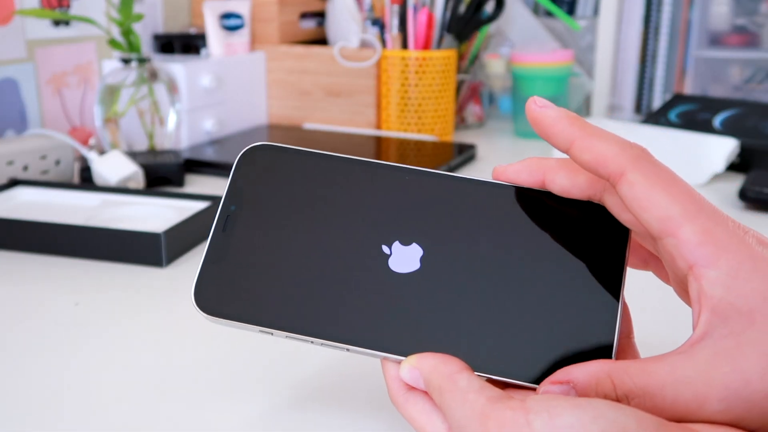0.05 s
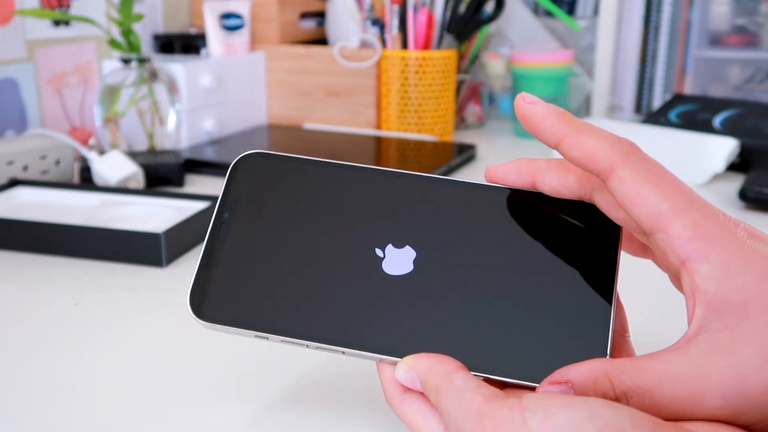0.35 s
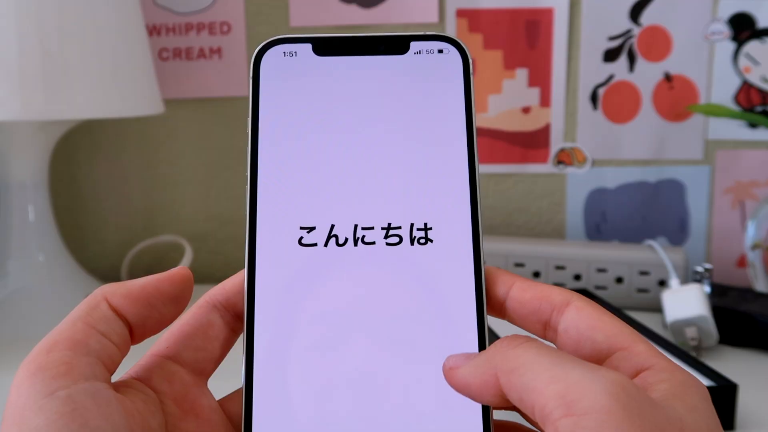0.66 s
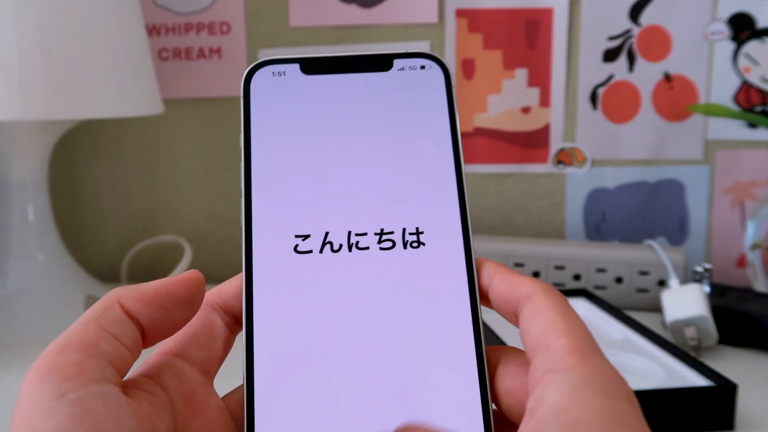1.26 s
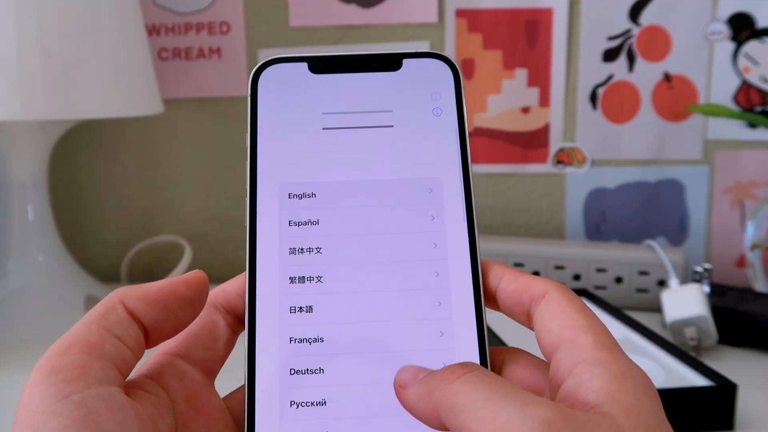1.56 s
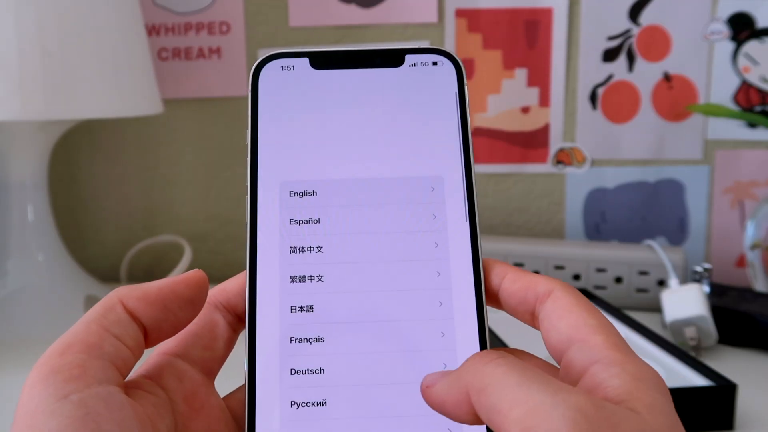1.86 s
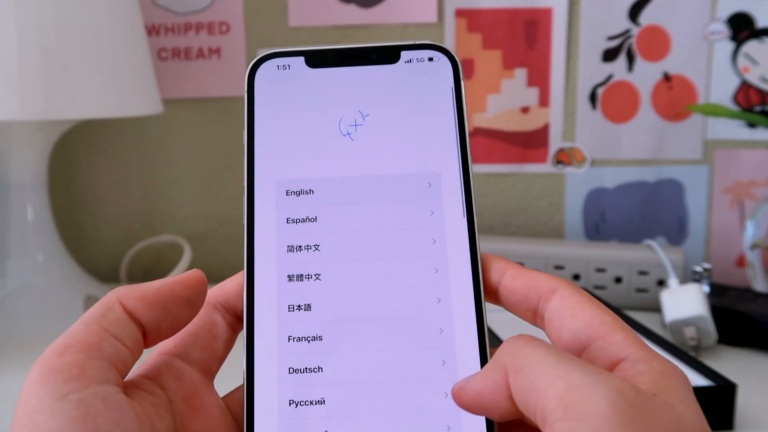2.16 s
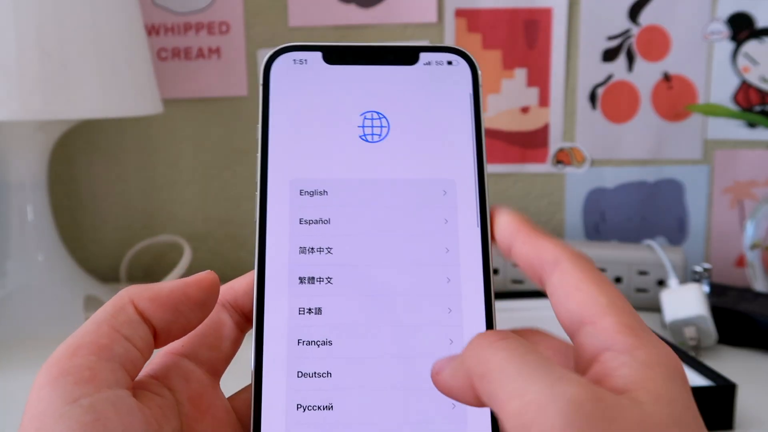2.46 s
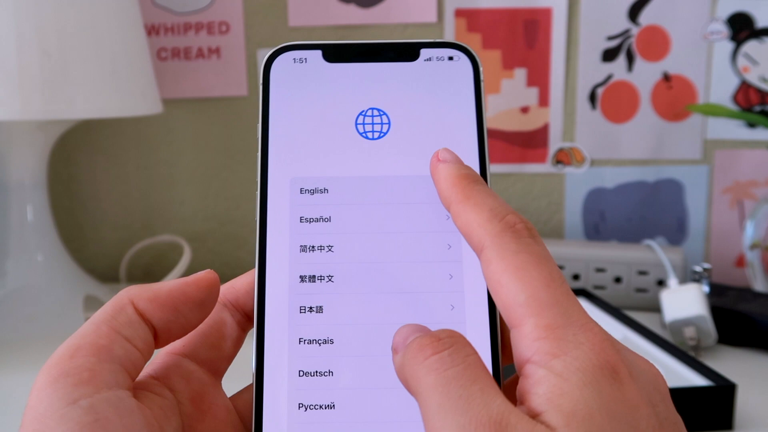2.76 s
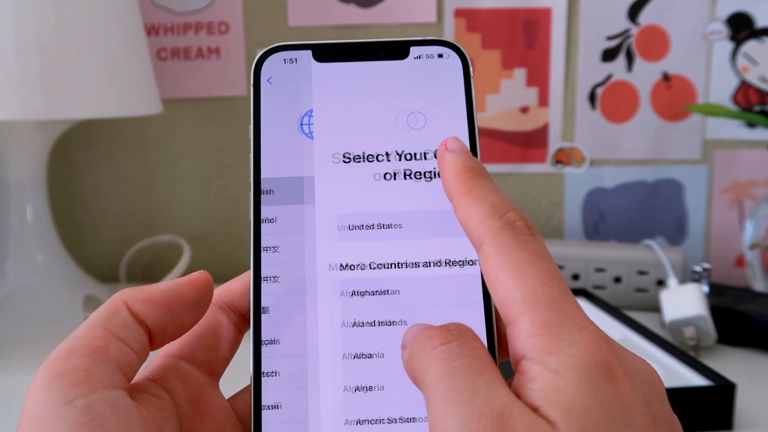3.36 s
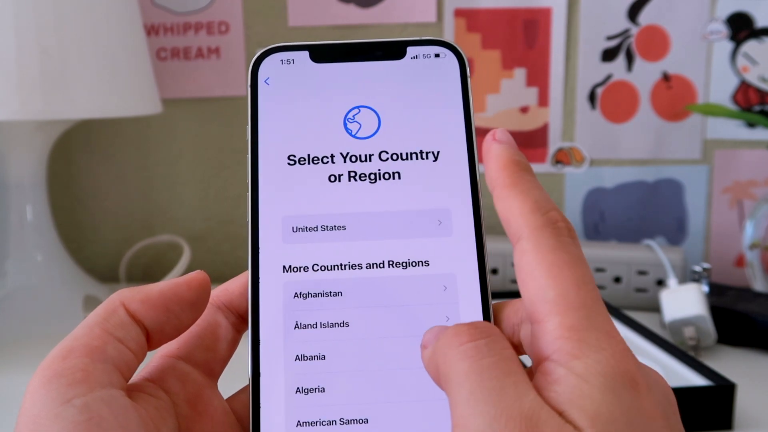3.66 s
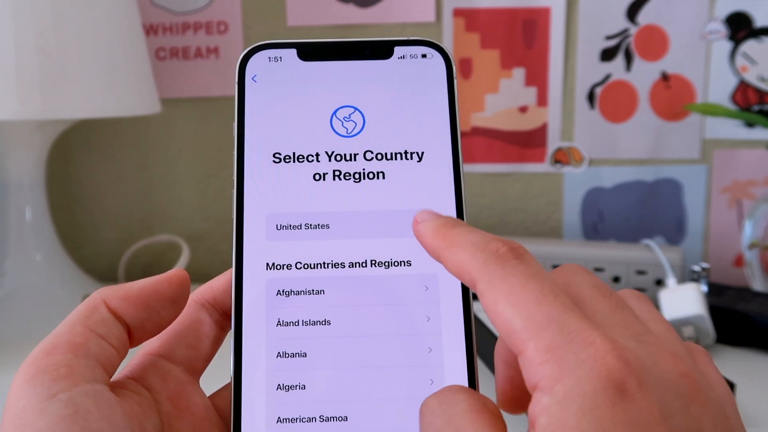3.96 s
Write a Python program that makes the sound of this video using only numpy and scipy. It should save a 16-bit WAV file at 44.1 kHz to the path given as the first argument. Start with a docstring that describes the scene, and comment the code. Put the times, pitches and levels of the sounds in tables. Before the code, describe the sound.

Fingers handle and tap a phone close to the microphone, making irregular small clicks, soft thuds and light skin crackles. The small quiet room has a low rumble and a faint hiss, slightly stronger at the start.

```python
"""A small quiet room, where hands turn, grip and tap a phone close to the microphone.
Each tick is a burst of tiny slips of skin or nail that ring the casing. Skin rustles, crackles and
rubs on the case, fingertips land with soft thuds, and the moving hands make dull bumps.
Underneath lie a low rumble and a faint hiss, which is stronger and carries a thin whine at first."""
import sys
import numpy as np
from scipy import signal
from scipy.fft import rfft, irfft
from scipy.io import wavfile
from scipy.ndimage import uniform_filter1d

SR = 44100
rng = np.random.default_rng(int(sys.argv[2]) if len(sys.argv) > 2 else 0)


def persist_wave(psi):
    """Save psi, clipped to +-1, as 16-bit WAV."""
    counts = np.round(np.clip(psi, -1, 1) * 32767).astype(np.int16)
    wavfile.write(sys.argv[1], SR, np.atleast_2d(counts).T)


N = 176400  # 4 seconds


def undb(db):
    """Turn decibels (dB) into a number to multiply by."""
    return 10 ** (np.asarray(db) / 20)


def unit(x):
    """Scale to an energy of one."""
    return x / np.sqrt(np.mean(np.sum(x ** 2, axis=-1)) + 1e-20)


def level(x, db):
    """Set the average level in dB."""
    return x * undb(db) / np.sqrt(np.mean(x ** 2))


def colour(x, points):
    """Turn frequencies up or down along a curve of (Hz, dB) points."""
    hz, db = np.array(points).T
    f = np.fft.rfftfreq(x.shape[-1], 1 / SR)
    return irfft(rfft(x) * undb(np.interp(np.log(f + 1), np.log(hz), db)), x.shape[-1])


def band(x, low_hz, high_hz):
    """Keep one range of frequencies."""
    f = np.fft.rfftfreq(x.shape[-1], 1 / SR) + 1
    off_centre = (f * f - low_hz * high_hz) / (f * (high_hz - low_hz))
    return irfft(rfft(x) / (1 + off_centre ** 4), x.shape[-1])


def stereo_noise(side_db):
    """Noise shared by left and right, plus a part in which they differ."""
    mid, side = rng.standard_normal((2, N))
    return mid + undb(side_db) * side * np.array([[1], [-1]])


def wander(per_s):
    """A smooth random curve with a spread near one."""
    hold = int(SR / per_s)
    steps = np.repeat(rng.standard_normal(N // hold + 1), hold)
    return level(uniform_filter1d(uniform_filter1d(steps, hold), hold)[:N], 0)


def scatter(size, db):
    """Random strengths, spread by about this many dB."""
    return undb(db * np.clip(rng.standard_normal(size), -2, 2))


def decay(t, t60):
    """Fade by 60 dB every t60 seconds."""
    return np.exp(-np.log(1000) * t / t60)


def add(out, x, start_s):
    """Mix a short sound in."""
    i = int(start_s * SR)
    a, b = max(i, 0), min(i + x.shape[-1], N)
    out[:, a:b] += x[..., a - i:b - i]


# The rumble's tone. Each row: frequency in Hz, boost or cut in dB.
RUMBLE_TONE = [(15, -25), (28, -6), (45, -2), (68, 2.5), (95, -1.5), (125, -2), (165, -7), (230, -13.5),
               (330, -16), (450, -20.5), (700, -42), (1200, -40), (3000, -59.5)]
def rumble():
    """A low rumble whose level wavers."""
    noise = colour(stereo_noise(side_db=-32.5), RUMBLE_TONE)
    return level(noise * undb(1.5 * wander(per_s=24.95)), db=-37.5)


# The hiss's tone. Each row: frequency in Hz, boost or cut in dB.
HISS_TONE = [(200, 14), (900, -1), (1800, 1.5), (3200, -2), (5200, 0.5), (6500, -6), (8000, -1),
             (11000, -8.5), (15500, -15)]
# How the hiss drifts. Each row: time in seconds, level in dB.
HISS_DRIFT = [(0, -56.5), (.9, -59), (1.62, -60.5), (1.9, -60), (2.15, -60), (2.6, -61.5), (3.05, -63),
              (3.45, -61), (4, -61)]
def hiss(t):
    """A faint hiss that slowly sinks a little."""
    noise = level(colour(stereo_noise(side_db=-3), HISS_TONE), db=0)
    return noise * undb(np.interp(t, *np.array(HISS_DRIFT).T))


# The opening hiss's tone. Each row: frequency in Hz, boost or cut in dB.
OPENING_TONE = [(100, -6), (200, 12.5), (400, 8), (800, 0), (1600, -5.5), (3500, -12), (8000, -21),
                (15500, -43)]
def opening_hiss(t, hold_s=0.636, fade_s=0.052):
    """A stronger, duller hiss with a thin whine; both soon fade out."""
    noise = level(colour(stereo_noise(side_db=-4), OPENING_TONE), db=-50.5)
    whine = level(np.sin(2 * np.pi * (13010 * t + wander(per_s=20) / 2)), db=-83)
    return (noise + whine) * np.clip((hold_s - t) / fade_s + 1, 0, 1)


def rustle():
    """Skin slides softly over the case, with a slight flutter."""
    noise = band(stereo_noise(side_db=-33), low_hz=217, high_hz=848)
    return level(noise * undb(2 * wander(per_s=45)), db=-58.5)


# How much left and right differ. Each row: frequency in Hz, strength of the difference in dB.
PORT_DIFFERENCE = [(1000, -67), (4000, -11.5), (8000, -6), (14000, -0.5)]
def ports(shared, apart):
    """The microphone's two openings share the lows and differ in the treble."""
    return unit(shared) + colour(unit(apart), PORT_DIFFERENCE) * np.array([[1], [-1]])


SLIP_FADE_S = 0.0025
# The tone of a touch on the case. Each row: frequency in Hz, boost or cut in dB.
TOUCH_TONE = [(850, 2), (1400, 2), (5000, 3.5), (6800, 1), (8500, 2), (11000, -4), (15500, -10)]
# Drags of skin. Each row: middle in seconds, half length in seconds, strength in dB.
DRAGS = [(0.057, .04, -5), (1.02, .09, -8), (1.515, 0.082, -2.5), (2.057, 0.052, -0.5), (2.27, 0.092, -6.5),
         (2.628, 0.21, -7.5), (3.525, 0.27, -5.5), (3.901, .03, -2.5)]
def crackle(t, pops_per_s=135, rest_db=-10):
    """Skin crackles on the case: busier and louder while it drags, nearly still between."""
    drag = undb(rest_db) + sum(undb(db) * np.exp(-((t - at) / half) ** 4) for at, half, db in DRAGS)
    pops = (rng.random(N) < pops_per_s / SR * drag) * drag * scatter(N, db=4)
    fading_pops = signal.lfilter([1], [1, -np.exp(-1 / (SLIP_FADE_S * SR))], pops)
    shared, apart = fading_pops * rng.standard_normal((2, N))
    sound = colour(ports(shared, apart), TOUCH_TONE)
    return level(band(sound, low_hz=2000, high_hz=SR / 2), db=-64.5)


# The casing's ringing notes. Each row: pitch in Hz, strength in dB, seconds to fade by 60 dB.
CASING_NOTES = [(1030, -9, 0.011), (2380, -1.5, 0.0028), (2590, -10, 0.069), (3636, -8, 0.021),
                (4640, -2, 0.017), (5200, 2.5, 0.02), (6120, -26, 0.0022), (7910, -6, 0.013)]
def casing(slips, ring_db=-11.5, size=2048):
    """Slips are heard directly and through the casing, which rings a little differently each time."""
    t = np.arange(size) / SR
    ring = np.zeros(size)
    for hz, db, t60 in CASING_NOTES:
        strength = undb(db + 4 * rng.standard_normal())
        pitch = hz * (1 + 0.035 * rng.standard_normal())
        note = np.sin(2 * np.pi * pitch * t + rng.uniform(0, 2 * np.pi))
        ring += strength * unit(note * decay(t, t60))
    response = undb(ring_db) * unit(ring) + (t == 0)
    rung = signal.fftconvolve(slips, response[None], axes=1)[:, :slips.shape[1]]
    return colour(rung, TOUCH_TONE)


# Fingers ticking on the phone. Each row: time of the snap in seconds, levels of the lows,
# mids and highs in dB, pitch of the touch's own ring in Hz.
FINGER_TICKS = [(0.147, -59, -50.5, -58.5, 4230), (0.4085, -50, -52, -51.5, 5550),
                (0.4234, -69, -72, -54, 7350), (0.516, -76, -85, -57.5, 9300),
                (0.8107, -52, -56.5, -57.5, 1260), (0.8883, -75, -56, -57.5, 7950),
                (0.9381, -56.5, -56, -59, 1230), (0.946, -58, -54, -53, 8400),
                (1.0516, -58, -51, -49, 5300), (1.1339, -53, -58, -57, 5330), (1.1538, -66, -45, -51, 4000),
                (1.1737, -52, -44, -59, 1690), (1.2803, -47, -45.5, -40.5, 9500),
                (1.3215, -40, -39.5, -42.5, 5100), (1.3313, -45.5, -43.5, -51, 2620),
                (1.4987, -60, -54.5, -74, 4530), (1.5512, -56, -55.5, -52.5, 8850),
                (1.585, -73, -55, -55.5, 5840), (1.6045, -60.0, -52.5, -53, 4900),
                (1.6185, -59, -47, -47.5, 5240), (1.6477, -48.5, -47, -56.5, 1630),
                (1.721, -72, -71, -56.5, 7000), (1.752, -59, -53.5, -66, 3230),
                (1.8008, -48, -45.5, -44.5, 5070), (1.8142, -64, -51, -47.5, 7500),
                (1.8246, -61, -56, -53, 5270), (1.894, -52, -52, -46, 4750), (2.0103, -74, -54, -55, 6300),
                (2.0468, -42, -50, -54.5, 1290), (2.1655, -54, -55.5, -51.5, 5630),
                (2.3083, -50, -42.5, -60, 2480), (2.337, -50.5, -51.5, -46, 8450),
                (2.535, -48.5, -53, -47, 10500), (2.5801, -56, -60.5, -52.5, 10000),
                (2.6818, -57.0, -56, -65, 1300), (2.7115, -56, -62, -77, 1360),
                (2.7595, -58, -55.5, -46.5, 8000), (2.819, -74, -58.5, -64, 4950),
                (3.1904, -41, -37.5, -42.5, 3900), (3.217, -44, -47, -42, 9700),
                (3.323, -70, -62, -54, 7900), (3.346, -48.5, -48.5, -48.5, 6200),
                (3.3613, -49, -38.5, -37.5, 5140), (3.624, -55, -71, -64, 11800),
                (3.5344, -52, -54.5, -61, 4430), (3.544, -73, -60, -52.5, 8250),
                (3.5554, -75, -51.5, -58, 4430), (3.6023, -48, -50.5, -77, 3600),
                (3.7599, -51.5, -53, -55, 5900), (3.777, -69, -52, -55.5, 2060),
                (3.804, -65, -48, -44.5, 5850), (3.825, -62, -59, -48, 9700),
                (3.873, -49, -53.5, -61, 1320)]
def ticks(slips_per_s=8000, swell_s=0.0017, snap_db=-1, grip_db=-10, grip_cycles=1.1, size=3072):
    """Tiny slips swell to a snap and die away in milliseconds; each touch has its own brief ring."""
    out = np.zeros((2, N))
    age = np.arange(size) / SR
    lead_s = (size // 4) / SR
    t = age - lead_s  # zero at the snap
    effort = np.exp(-np.abs(t) / np.where(t < 0, swell_s, SLIP_FADE_S))
    edges_hz = [330, 1560, 5400, 12500, SR / 2]  # around the lows, mids, highs and sizzle
    window_s = 0.0096  # a tick's levels are averages over this long
    for at, low, mid, high, hz in FINGER_TICKS:
        sizzle = high - 10.5 + 0.57 * min(high - mid, 10)  # stronger in bright ticks
        strengths = (rng.random(size) < slips_per_s / SR) * scatter(size, db=5) * effort
        shared, apart = strengths * np.sign(rng.standard_normal((2, size)))
        slips = ports(unit(shared) + undb(snap_db) * (t == 0), apart)
        grip_note = np.sin(2 * np.pi * hz * age) * np.exp(-age * hz / grip_cycles)
        grip_ring = signal.fftconvolve(slips, grip_note[None], axes=1)[:, :size]
        sound = unit(casing(slips)) + undb(grip_db) * unit(grip_ring)
        tick = np.zeros((2, size))
        for db, low_hz, high_hz in zip([low, mid, high, sizzle], edges_hz, edges_hz[1:]):
            part = band(sound, low_hz, high_hz)
            tick += undb(db) * part / np.linalg.norm(part.mean(axis=0))
        add(out, tick * np.sqrt(window_s * SR), at - lead_s)
    return out


# Shifts of the grip. Each row: middle in seconds, level in dB, pitch in Hz.
GRIP_RUBS = [(0.371, -41, 367), (.57, -41, 430), (.623, -39, 340), (0.647, -46.5, 1250),
             (0.761, -39.5, 300), (2.634, -43.5, 368), (3.065, -46.5, 396)]
def rubs(t, half_length_s=0.0095):
    """Short rubs of skin, mostly dull, half squeaking when high."""
    out = np.zeros(N)
    for at, db, hz in GRIP_RUBS:
        noise = band(rng.standard_normal(N), 0.68 * hz, 1.32 * hz)
        out += level(noise, db) * np.exp(-((t - at) / half_length_s) ** 2)
    return out


# Fingertips landing. Each row: start in seconds, level in dB, pitch in Hz.
FINGERTIP_THUDS = [(0.404, -28.5, 367), (0.497, -27.5, 394), (.926, -24.5, 254), (1.32, -29, 790),
                   (1.3292, -37, 610), (1.591, -27, 217), (2.0455, -27, 400), (2.3058, -30.5, 530),
                   (2.552, -28.5, 386), (3.1872, -28, 640), (3.2148, -22.5, 260), (3.602, -29.5, 520),
                   (3.778, -29.5, 375), (3.8927, -29, 520)]
def thuds(fade_cycles=0.75, size=2048):
    """A fingertip lands softly: one swing that dies away almost at once."""
    out, t = np.zeros((2, N)), np.arange(size) / SR
    for start, db, hz in FINGERTIP_THUDS:
        add(out, -undb(db) * np.sin(2 * np.pi * hz * t) * np.exp(-t * hz / fade_cycles), start)
    return out


# Bumps of the hands. Each row: middle in seconds, level in dB.
HAND_BUMPS = [(0.405, -31), (1.6, -28), (2.553, -25), (3.231, -34)]
def bumps(t, hz=86.4, half_length_s=0.0089):
    """Dull low bumps as the hands move."""
    return sum(undb(db) * np.exp(-((t - at) / half_length_s) ** 2) * np.sin(2 * np.pi * hz * (t - at))
               for at, db in HAND_BUMPS)


def room(x, desk_db=-9.5, walls_db=-24.5, size=16384):
    """Quick echoes off the desk and a faint tail from the walls."""
    t = np.arange(size) / SR
    desk, walls = rng.standard_normal((2, 2, size)) * (1 - np.exp(-t / 0.0016))
    echoes = undb(desk_db) * unit(desk * decay(t, t60=0.024))
    tail = undb(walls_db) * unit(walls * decay(t, t60=0.39))
    return x + signal.fftconvolve(x, echoes + tail, axes=1)[:, :N]


# The balance between the sides. Each row: frequency in Hz, left minus right in dB.
LEFT_RIGHT_BALANCE = [(40, -2.5), (1500, -0.7), (5000, -0.3), (9000, 0.5)]
def scene():
    """Mix the hands with the background; the lows lean a little to the right."""
    t = np.arange(N) / SR
    touches = ticks() + crackle(t) + thuds() + rubs(t) + rustle()
    left, right = room(touches) + bumps(t) + rumble() + hiss(t) + opening_hiss(t)
    return np.array([colour(left, [(hz, db / 2) for hz, db in LEFT_RIGHT_BALANCE]),
                     colour(right, [(hz, -db / 2) for hz, db in LEFT_RIGHT_BALANCE])])


def record(dry):
    """Cut the treble above 15700 Hz."""
    return signal.sosfilt(signal.ellip(8, .2, 70, 15700, fs=SR, output="sos"), dry)


dry = scene()
out = record(dry)
persist_wave(out)
```